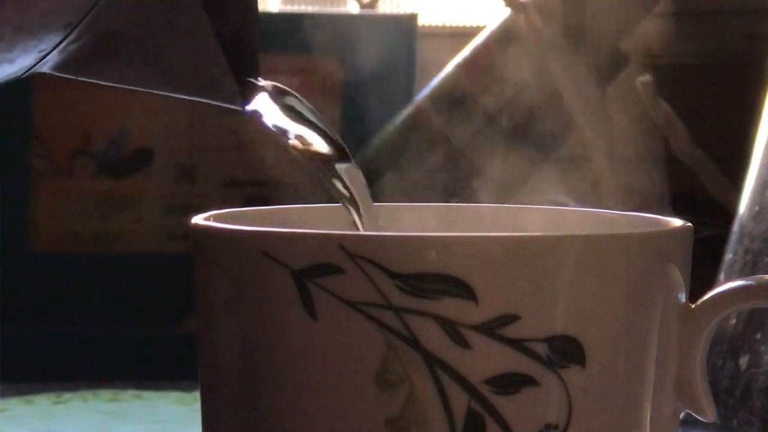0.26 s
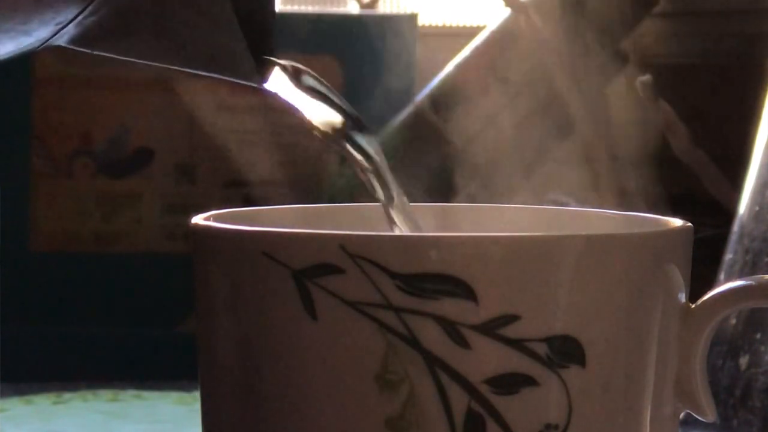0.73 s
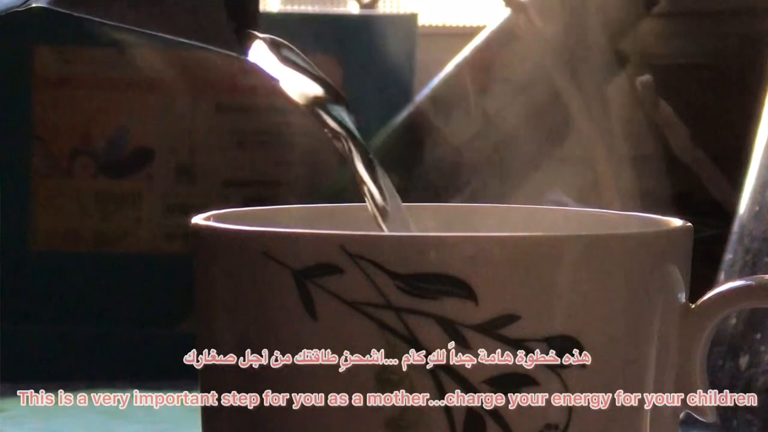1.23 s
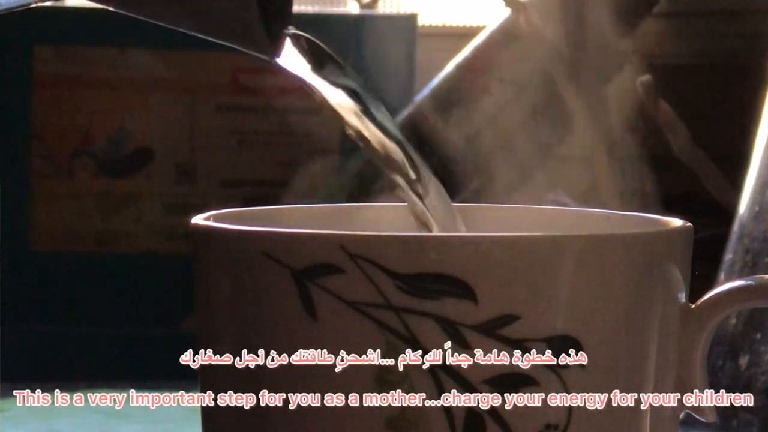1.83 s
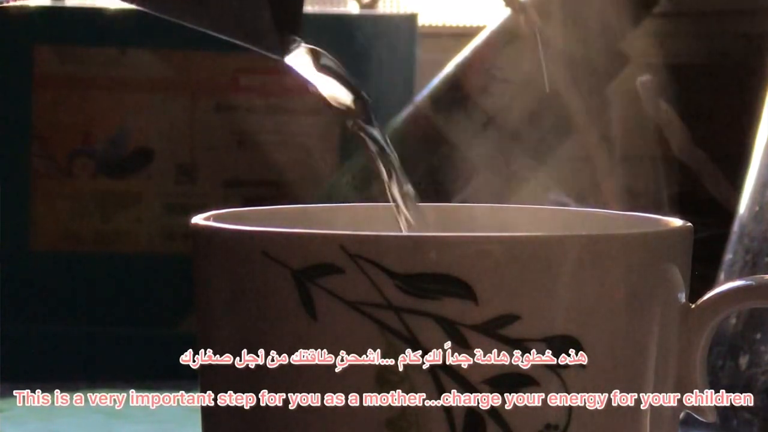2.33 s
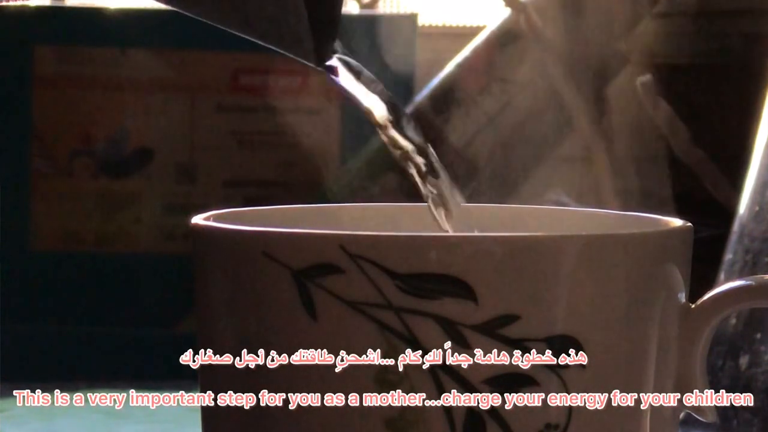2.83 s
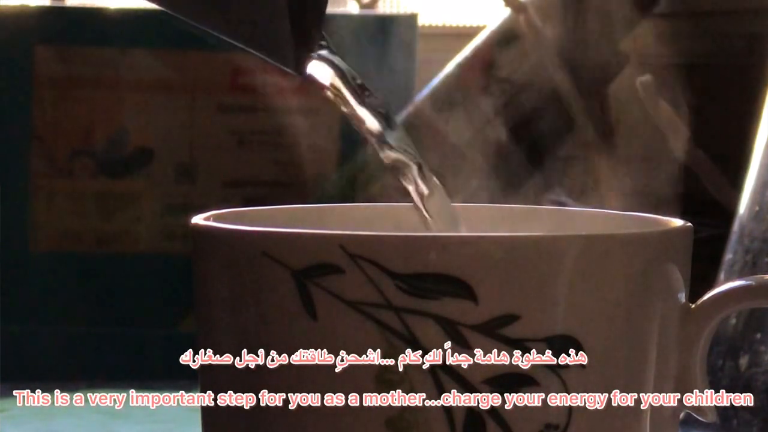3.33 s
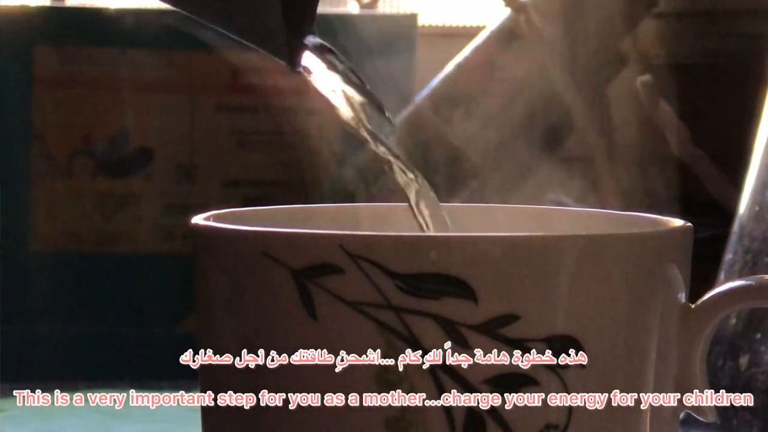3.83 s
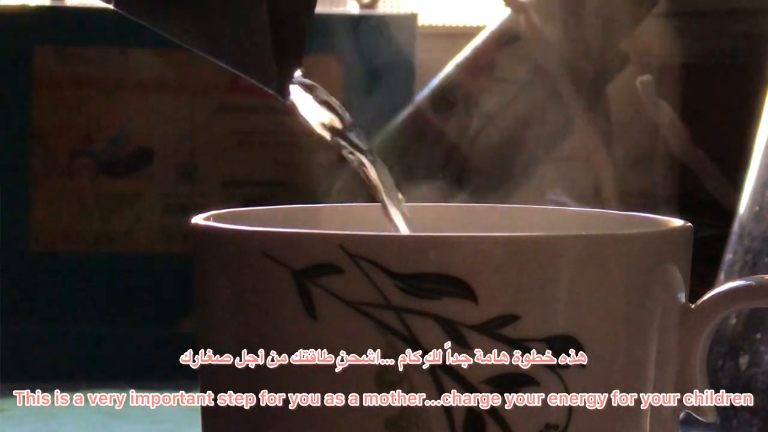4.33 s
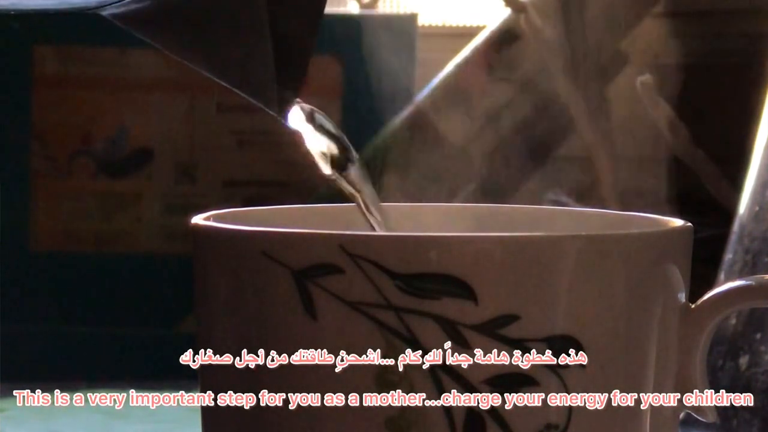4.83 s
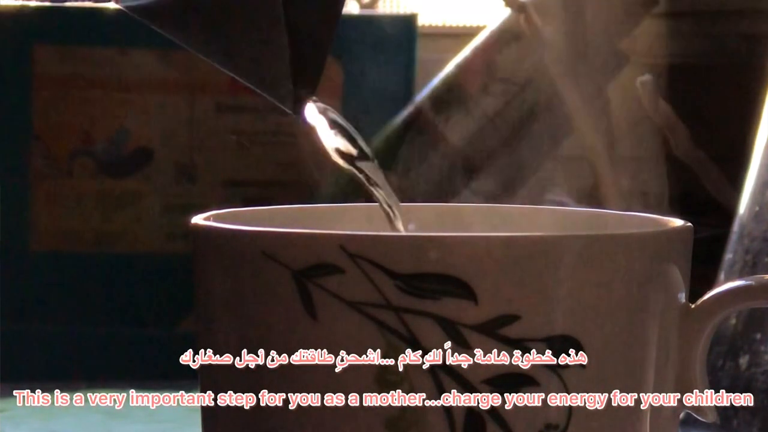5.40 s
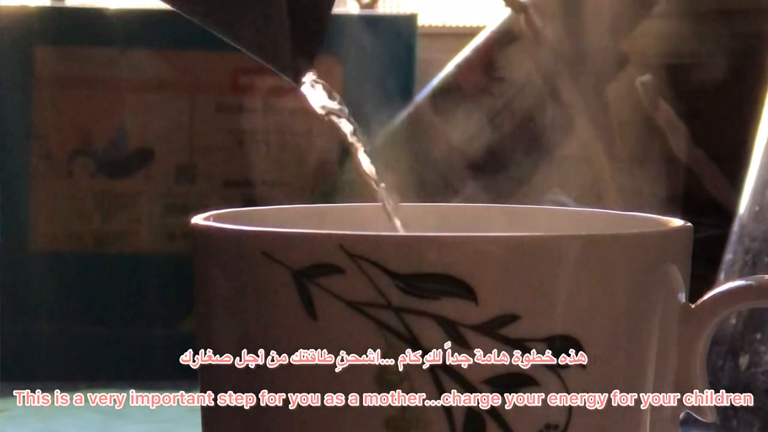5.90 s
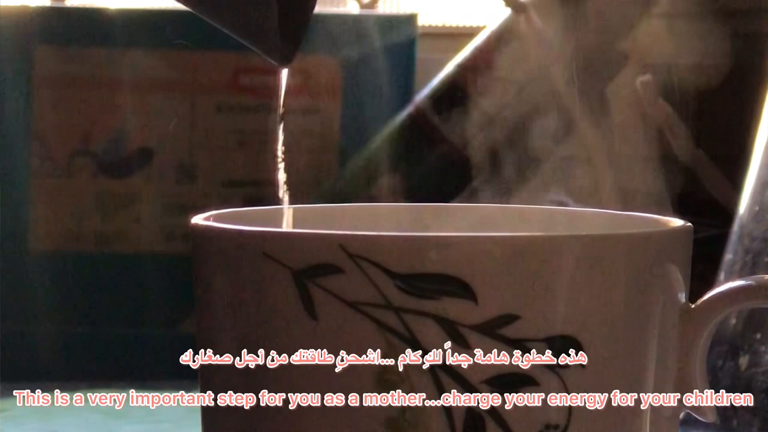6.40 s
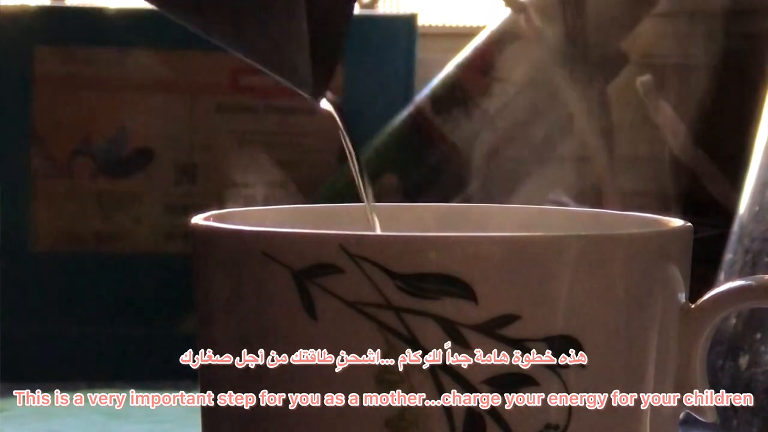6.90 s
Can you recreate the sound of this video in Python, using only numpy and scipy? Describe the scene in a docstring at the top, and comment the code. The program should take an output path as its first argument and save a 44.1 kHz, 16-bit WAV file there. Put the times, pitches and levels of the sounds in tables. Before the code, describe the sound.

In a small kitchen, water streams from a kettle into a ceramic mug. Rounded, hollow bubble plops come at uneven intervals, with light patter, spray and fizzing ticks around them. One plop stands out well before the middle. The stream breaks into sharper splashes, thins abruptly near the end, leaves a faint hiss, and two drips follow. A low, dull machine hum continues throughout. Close, slightly dull microphone with short room reflections.

```python
"""Small kitchen: hot water runs from a kettle into a ceramic mug, over a low machine hum.
Trapped bubbles ring the mug's air column; bursts of random impacts ring its modes as patter and spray.
The stream thins to a trace, a faint hiss swells, and two drips fall, each a slap and a gliding tone.
Behind: a soft rub (swelling low noise) and two low blips (upward-sliding harmonics with noise)."""
import sys
import numpy as np
from scipy import signal
from scipy.fft import rfft, irfft
from scipy.io import wavfile
from scipy.ndimage import uniform_filter1d

SR = 44100
rng = np.random.default_rng(int(sys.argv[2]) if len(sys.argv) > 2 else 0)


def transcribe(signal):
    """Save signal, clipped to [-1, 1], as a 16-bit WAV file at the path in sys.argv[1]."""
    frames = np.atleast_2d(signal).T
    limited = np.clip(frames, -1, 1)
    pcm = np.round(limited * 32767).astype(np.int16)
    wavfile.write(sys.argv[1], SR, pcm)


N = 315315
TIME_S = np.arange(N) / SR
BRIEF_S = TIME_S[:SR // 5]   # time axis of one short event

# Table levels are nominal: before the trims, mug colour and microphone.
# Steady hum lines: line_hz, level_rms_db, wander_rms_hz
HUM_LINES = [(46.7, -87, 2.2), (64.6, -83, 5.8), (196.5, -65.5, 2.94), (214.9, -61, 1.014), (244, -72, 3),
             (343.4, -70, 2.085), (440, -76, 1.9), (607, -79.5, 2.7)]
# Spectrum of the dull rush, relative: freq_hz, density_db_per_hz
RUSH_SPECTRUM = [(36, -52.5), (50, -24), (82, -30.5), (100, -12), (135, -7), (168, 1), (228, -7.5),
                 (285, -7), (330, -8), (450, -19.5), (900, -19), (1600, -26), (2400, -29), (4500, -35.5),
                 (8000, -47)]
# Low blips: start_s, level_db, start_pitch_hz
LOW_BLIPS = [(1.963, -48, 212.7), (5.03, -49.5, 214.2)]
# Air column resonances: freq_hz, width_hz, gain_db
AIR_MODES = [(558, 110, -11.5), (1040, 72, 4)]
# Thud resonances: freq_hz, width_hz, gain_db
THUD_MODES = [(320, 25, 0.88), (631, 94, -1)]
# Mug resonances driven by patter: freq_hz, width_hz, gain_db
PATTER_MODES = [(614, 100, -15.5), (1050, 130, 4.5), (1415, 110, 9), (1598, 120, 3.5), (1761, 45, 8),
                (2230, 63, -11)]
# Mug resonances driven by spray: freq_hz, width_hz, gain_db
SPRAY_MODES = [(2477, 270, -1.5), (2894, 110, 4.5), (3130, 250, -2.5), (4170, 410, -10), (5150, 840, -20),
               (6870, 380, -22)]
# Narrow peaks and dips of mug and surroundings, shared by all the water: freq_hz, width_hz, gain_db
MUG_COLOUR = [(830, 9.8, 6.5), (1211, 80, -9.5), (1272, 14, 3.5), (1380, 8.6, 4.5), (1627, 17, 6),
              (1787, 58, 3), (2090, 11, 4), (4200, 260, 1), (4900, 240, -5.5), (5220, 27, 8)]
# Droplets on the mug wall: start_s, level_db
WALL_TICKS = [(0.807, -49.5), (1.264, -57), (1.429, -61), (2.194, -57), (2.239, -50), (2.809, -53),
              (2.842, -54), (3.003, -58), (3.402, -51), (4.236, -51), (4.651, -49.5), (4.823, -52.5),
              (4.854, -51.5), (5.919, -56), (6.018, -54), (6.119, -55)]
# Bursts of tiny bubbles: start_s, level_db, centre_hz
FIZZ_BURSTS = [(1.4155, -48.5, 3520), (1.608, -46, 4730), (2.089, -53, 4100), (2.278, -31.5, 4700),
               (2.283, -37, 4800), (2.8583, -41.5, 4360), (2.936, -47, 4060), (2.955, -50, 4200),
               (3.09, -45, 4140), (3.21, -44, 3820), (3.4462, -44.5, 4600), (3.8952, -42.5, 4000),
               (4.2667, -43.5, 3700), (4.6498, -51, 3970), (4.936, -51, 4100), (5.226, -45.5, 3700),
               (5.41, -41.5, 4200), (5.8377, -45, 3960), (6.241, -42, 5240), (6.958, -51, 2650),
               (7.109, -46, 4480)]
# Froth where the jet drags in air: start_s, level_rms_db, peak_delay_s
FROTH_FLARES = [(0.509, -65.5, 0.036), (1.059, -63.5, 0.01), (5.405, -47, 0.0072), (5.451, -52, 0.0089)]
# Drips: start_s, impact_db, impact_pitch_hz, bubble_db, bubble_pitch_hz, glide_hz_per_s, bubble_peak_delay_s
DRIP_EVENTS = [(6.8512, -35, 1470, -49.5, 1421, 1490, 0.018), (7.076, -42, 1825, -57, 1860, 5440, 0.014)]
# Smaller bubbles on the upper air column mode: start_s, level_db
UPPER_PLINKS = [(0.026, -46), (0.268, -49), (0.489, -43), (0.512, -40), (0.528, -45), (0.544, -46),
                (0.604, -42.5), (0.674, -50), (0.767, -48.5), (0.994, -47), (1.077, -46.5), (1.405, -51.5),
                (1.515, -49.5), (1.54, -43), (1.609, -50.5), (1.857, -48), (2.08, -52), (2.137, -43.5),
                (2.243, -44), (2.289, -42), (2.311, -42), (2.326, -41), (2.432, -51.5), (2.571, -47.5),
                (2.739, -49), (2.773, -45.5), (2.792, -42.5), (2.94, -44), (3.007, -58), (3.088, -49.5),
                (3.326, -49.5), (3.406, -45.5), (3.61, -47), (3.639, -51), (3.766, -51), (3.841, -41),
                (3.863, -45), (3.895, -48), (3.916, -47), (4.176, -48.5), (4.218, -44.5), (4.249, -41.5),
                (4.267, -47), (4.52, -45), (4.627, -46), (4.762, -42.5), (4.878, -49.5), (5.036, -50.5),
                (5.122, -53), (5.348, -53), (5.375, -48), (5.406, -37), (5.434, -42), (5.452, -48),
                (5.467, -40), (5.574, -40.5), (5.835, -42.5)]
# Sharp, broad cracks of the water, some as a bubble is trapped: start_s, air_column_db, patter_db, spray_db,
# tick_db
SLAP_EVENTS = [(0.703, -45, -55, -53, -59), (0.845, -50, -64, -59, -63), (0.995, -50, -51.5, -62, -73),
               (1.309, -47, -49.5, -58.5, -62), (1.915, -54, -59, -73, -52.5), (3.261, -44, -46, -52, -50),
               (3.774, -50, -48, -65, -71), (4.329, -57, -51, -63, -49.5), (4.356, -51, -44.5, -63, -55),
               (5.121, -45, -45.5, -51, -72), (5.246, -52, -41.5, -48, -46.5), (5.687, -58, -52, -66, -69),
               (5.809, -35, -45, -37.5, -63), (5.943, -50, -38, -47.5, -61), (6.034, -47.5, -38, -44, -42),
               (6.157, -49, -47, -58, -43), (6.175, -43, -39, -38.5, -51), (6.205, -44, -49, -54, -51),
               (6.246, -49, -38, -64, -43.5)]
# Loudest plops: start_s, level_db, pitch_hz, patter_re_level_db
LOUD_PLOPS = [(0.024, -44.5, 897, -18), (0.325, -41.5, 945, -13), (0.421, -47, 985, -29),
              (0.438, -40.5, 996, -22), (0.49, -48, 1100, -7), (0.601, -39, 1015, -17),
              (0.809, -37, 982, -22), (1.212, -40.5, 1036, -10), (1.265, -30, 1023, -18.5),
              (1.539, -51, 1040, 0), (1.552, -35, 1000, -28), (1.591, -35, 1008, -16),
              (1.617, -35, 1033, -13), (1.834, -44, 1044, -20), (1.855, -34, 1018, -19),
              (1.878, -44, 1005, -24), (1.929, -38.5, 1016, -8), (2.115, -38, 1060, -23),
              (2.14, -44, 1040, -21), (2.205, -34.5, 1040, -26.5), (2.237, -32.5, 1023, -7.5),
              (2.286, -14.5, 1036, -20), (2.309, -33.5, 1010, -3), (2.325, -32.5, 966, -12),
              (2.431, -38.5, 1050, -14), (2.571, -41.5, 1010, -1.5), (2.605, -42.5, 1036, -8),
              (2.653, -41.5, 1040, -15), (2.684, -43.5, 1024, -15), (2.74, -38.5, 1040, -12),
              (2.769, -33.5, 1090, -11.5), (2.779, -29.5, 1030, -22), (2.792, -38, 1005, -6),
              (2.81, -31, 1040, -19), (2.841, -33.5, 1000, -11), (2.857, -41, 1020, -10),
              (2.921, -36.5, 1040, -8), (2.938, -40.5, 1013, -14), (3.004, -33.0, 1057, -19),
              (3.09, -36, 1047, -3), (3.119, -40.5, 1040, -18), (3.147, -38, 1050, -12),
              (3.273, -42, 1030, -7), (3.297, -31, 1044, -20), (3.316, -32.5, 1050, -22),
              (3.352, -39.5, 995, -4), (3.374, -39, 1007, -16), (3.404, -34, 1010, -21),
              (3.447, -44, 1050, -12), (3.487, -39, 1070, -12), (3.544, -43.5, 1065, -12.5),
              (3.571, -40.5, 1062, -3), (3.62, -42, 1090, -6), (3.652, -29.5, 1062, -39),
              (3.841, -41.5, 1040, -13), (3.866, -44, 1050, -12), (4.005, -43, 1060, -16),
              (4.021, -41.5, 1076, -11), (4.177, -46, 1040, -9), (4.198, -35, 1060, -10.5),
              (4.22, -37, 1066, -10), (4.237, -39, 1070, -16), (4.248, -38, 1100, -2),
              (4.266, -36, 1078, -3.5), (4.33, -41.5, 1116, -4), (4.468, -46, 1050, -14),
              (4.508, -33, 1073, -10.5), (4.614, -48, 1080, -15), (4.626, -41.5, 1090, -18),
              (4.652, -42, 1110, -6), (4.691, -35.5, 1057, -9.5), (4.72, -37.5, 1070, -15),
              (4.736, -39, 1000, -23), (4.762, -37, 1060, -15), (4.785, -32, 1093, -15),
              (4.809, -35.5, 1013, -7), (4.834, -29, 1050, -19), (4.854, -37.5, 1054, -9),
              (4.866, -39, 1024, -16), (4.878, -44, 1050, -1), (5.064, -38.5, 1057, -8.5),
              (5.291, -36.5, 997, -16), (5.313, -34, 992, -10), (5.325, -40, 1070, -11),
              (5.336, -38.5, 1100, -7), (5.378, -34, 1060, -21), (5.409, -35.5, 1030, -14),
              (5.433, -48, 1040, -2), (5.452, -31.0, 990, -13), (5.483, -36, 1043, -10),
              (5.515, -37, 1080, -5), (5.741, -41.5, 1116, -2), (5.82, -28.5, 1040, -12),
              (5.838, -23.5, 1070, -18), (5.861, -31, 1054, -17), (5.882, -36.5, 1110, -19),
              (5.894, -35.5, 994, -18), (5.904, -36, 1018, -19), (5.963, -37, 974, 0),
              (5.981, -42, 1040, -5), (6.033, -41, 1090, -20), (6.07, -40.5, 1104, -6),
              (6.255, -36.5, 1054, -11), (6.268, -39, 1140, -4), (6.288, -27.5, 1115, -9),
              (6.304, -37, 1230, -18), (6.314, -43, 1090, -7), (6.325, -43, 1230, -5),
              (6.347, -39.5, 1040, -26), (6.397, -36, 1060, -21), (6.416, -43.5, 1090, -16)]
# Flow of the stream: time_s, gurgle_db, patter_db, spray_db
STREAM_FLOW = [(0.0, -64.5, -78.5, -67), (0.61, -63.5, -65.5, -62.5), (1.03, -69.5, -77, -64),
               (2.06, -59, -72, -63), (2.971, -60, -68, -64.5), (3.09, -63.5, -73, -62.5),
               (3.44, -56.5, -75, -65), (3.64, -61.5, -66.5, -68.5), (4.16, -62.5, -69, -63.5),
               (4.74, -58.5, -64, -67), (4.91, -61.5, -73, -59.5), (5.14, -62.5, -73, -73),
               (5.43, -61, -59, -60), (5.74, -63.5, -69.5, -69), (5.93, -51, -55.5, -62.5),
               (6.02, -63, -61, -60.5), (6.21, -64, -59, -65), (6.37, -55, -71.5, -70),
               (6.5, -67, -67, -85)]

# Room
RUSH_DB, RUSH_DEFICIT_DB, RUSH_SETTLE_S = -57.5, 1.5, 2   # starts softer by the deficit; time constant
KITCHEN_T60_S, KITCHEN_DB = 0.33, -11.5
CUTOFF_HZ = 8600
RUB_START_S, RUB_DB, RUB_HZ = 0.82, -57.5, 380
# Stream
GURGLE_TRIM_DB, PATTER_TRIM_DB, SPRAY_TRIM_DB = -2, -3, -1
SIZZLE_RE_SPRAY_DB = -10   # follows the spray level, without its trim
RINGING_RE_GURGLE_DB, RINGING_RATE_HZ = -6, 99   # the air column sings on between plops
THIN_START_S, THIN_END_S = 6.38, 6.5
# The air column shortens as the mug fills
EMPTY_HZ, FULL_HZ, FILL_S, PITCH_SCATTER_HZ = 985, 1151, 4.8, 30
UPPER_HZ, UPPER_RISE_HZ_PER_S, UPPER_SCATTER_HZ = 2839, 14, 20
# Plops
PLOP_TRIM_DB, PLOP_LEAD_S, PLINK_TRIM_DB = -3, 0.00052, -3.5
PLOP_SPRAY_DB, THUD_DB = -20, -10   # re the note
USUAL_PLOP_DB, LOSS_DB_PER_DB = -38.5, 0.14   # big plops: relatively less spray and thud
SCOOP, SCOOP_S = 0.36, 0.00067   # starts this share flat; settling time constant
THUD_CUT_HZ = 220   # the small mug radiates little below this
SMALL_PLOPS_PER_S, SMALL_PLOP_RE_GURGLE_DB, SMALL_SPREAD_DB = 14, 7, 0.5
SMALL_PATTER_DB, SMALL_SPRAY_DB = -9, -12.5   # re the note
# Fizzes and droplets
FIZZ_TRIM_DB, USUAL_FIZZ_DB = -5.5, -47
FIZZ_TICK_DB, FIZZ_TICK_FOLLOWS = -57, 0.14   # tick of a usual fizz; share of the fizz's level swing
RIM_DB_PER_S = -1   # re mid-pour; negative: the highest sounds lose level as the pour goes on
STRAYS_PER_S, STRAY_DB, STRAY_SPREAD_DB = 28, -63, 3.5
STRAY_LOW_HZ, STRAY_HIGH_HZ, STRAY_CYCLES = 1830, 7100, 8.3
GRAINS_PER_S, FIRST_CONTACT = 12000, 2.3   # impacts within a splash; boost of the first


def from_db(db):
    """Decibels to gain."""
    return 10 ** (np.asarray(db) / 20)


def rms_one(x):
    """Scale to an rms of one."""
    return x / np.sqrt(np.mean(x ** 2) + 1e-20)


def add(out, start_s, sound):
    """Mix a short sound in at start_s."""
    at = max(int(start_s * SR), 0)
    out[at:at + len(sound)] += sound[:N - at]


def lowpass(x, order, cut_hz):
    """Butterworth treble cut."""
    return signal.sosfilt(signal.butter(order, cut_hz, fs=SR, output="sos"), x)


def drift(rate_hz):
    """Slow random motion, rms of one: low-passed noise."""
    freq_hz = np.fft.rfftfreq(N, 1 / SR)
    spectrum = rfft(rng.standard_normal(N)) / (1 + (freq_hz / rate_hz) ** 2)
    return rms_one(irfft(spectrum, N))


def surges(rate_hz, depth_db):
    """Gain that wobbles at random within +/- depth_db."""
    return from_db(depth_db * np.tanh(drift(rate_hz)))


def resonate(x, modes):
    """Parallel two-pole resonances with alternating signs."""
    out = 0
    for k, (hz, width_hz, gain_db) in enumerate(modes):
        r = np.exp(-np.pi * width_hz / SR)
        poles = [1, -2 * r * np.cos(2 * np.pi * hz / SR), r * r]
        ring = signal.lfilter([1, 0, -1], poles, x + 1e-18)
        out = out + (-1) ** k * from_db(gain_db) * (1 - r * r) / 2 * ring
    return out


def swell(peak_s):
    """Envelope of a driven resonance: builds to one at peak_s, then dies."""
    return BRIEF_S / peak_s * np.exp(1 - BRIEF_S / peak_s)


def glide(hz, rise_hz_per_s):
    """Phase of a tone with linearly rising pitch."""
    return 2 * np.pi * (hz + rise_hz_per_s * BRIEF_S / 2) * BRIEF_S


def splash(modes, decay_s):
    """Decaying burst of separate tiny impacts rings the modes; peak of about one."""
    hits = rng.random(len(BRIEF_S)) < GRAINS_PER_S / SR
    burst = rng.standard_normal(len(BRIEF_S)) * hits * np.exp(-BRIEF_S / decay_s)
    burst[0] += FIRST_CONTACT
    sound = resonate(burst, modes)
    return sound / (2 * np.sqrt(uniform_filter1d(sound ** 2, size=100).max()))


def droplets(per_s, spread_db, clumps):
    """Random impacts of uneven size and either sign, scaled by the clumps gain."""
    size_db = spread_db * np.minimum(rng.exponential(1, N), 3.5)
    sizes = from_db(size_db) * rng.choice([-1, 1], N)
    return sizes * (rng.random(N) < per_s / SR) * clumps


def bubbles(low_hz, high_hz, per_s, cycles, clumps):
    """Small bubbles of ten sizes, each ringing for a few cycles at its own pitch; rms of one."""
    clicks = droplets(per_s, 4.3, clumps)
    size_class = rng.integers(0, 10, N)
    out = np.zeros(N)
    for k, hz in enumerate(np.geomspace(low_hz, high_hz, 10)):
        out += resonate(clicks * (size_class == k), [(hz, hz / cycles, 0)])
    return rms_one(out)


def column_hz(time_s):
    """Air column pitch, rising as the mug fills."""
    return FULL_HZ + (EMPTY_HZ - FULL_HZ) * np.exp(-time_s / FILL_S)


def exposure_db(time_s):
    """Level slope of the highest sounds, zero at mid-pour."""
    return RIM_DB_PER_S * (time_s - THIN_START_S / 2)


def flow():
    """Gurgle, patter and spray levels in dB at every sample, interpolated."""
    time_s, *levels_db = np.transpose(STREAM_FLOW)
    return [np.interp(TIME_S, time_s, level_db) for level_db in levels_db]


def kitchen(x):
    """Diffuse reflections from nearby walls: decaying noise, evened so that no single pitch rings on."""
    t = TIME_S[:SR // 2]
    fade = from_db(-60 * t / KITCHEN_T60_S) * (t > .006)
    tail = rng.standard_normal(len(t)) * fade
    for _ in range(10):   # flatten the spectrum, then restore the decay
        tail = irfft(np.exp(1j * np.angle(rfft(tail))), len(t))
        tail = tail * fade / np.sqrt(np.abs(uniform_filter1d(tail ** 2, size=400)) + 1e-20)
    return from_db(KITCHEN_DB) * signal.fftconvolve(x, tail / np.linalg.norm(tail))[:N]


def hum():
    """Machine drone: sines of wandering pitch on a dull rush of shaped noise."""
    hz, db = np.transpose(RUSH_SPECTRUM)
    freq_hz = np.fft.rfftfreq(N, 1 / SR)
    shape = from_db(np.interp(np.log(freq_hz + 1), np.log(hz), db))
    rush = rms_one(irfft(rfft(rng.standard_normal(N)) * shape, N))
    out = from_db(RUSH_DB - RUSH_DEFICIT_DB * np.exp(-TIME_S / RUSH_SETTLE_S)) * rush
    for line_hz, line_db, wander_hz in HUM_LINES:
        phase = 2 * np.pi * np.cumsum(line_hz + wander_hz * drift(6.14)) / SR
        out += from_db(line_db) * np.sqrt(2) * np.sin(phase)
    return out


def rub():
    """Soft rub: low resonant noise swells and fades."""
    out = np.zeros(N)
    noise = rms_one(resonate(rng.standard_normal(len(BRIEF_S)), [(RUB_HZ, 110, 0)]))
    add(out, RUB_START_S, from_db(RUB_DB) * swell(peak_s=0.028) ** 2 * noise)
    return out


def blips():
    """Faint noise swish leads into three upward-sliding harmonics with a low rustle."""
    out = np.zeros(N)
    for start_s, db, hz in LOW_BLIPS:
        phase = glide(hz, 1000)
        tone = swell(peak_s=0.03) ** 1.4 * np.sin(phase)
        tone += swell(peak_s=0.014) ** 3.2 * np.sin(2 * phase)
        tone += 0.099 * swell(peak_s=0.0073) ** 3 * np.sin(3 * phase)
        rustle = rms_one(resonate(rng.standard_normal(len(BRIEF_S)), [(560, 94, 0)]))
        swish = rms_one(resonate(rng.standard_normal(len(BRIEF_S)), [(2040, 860, 0)]))
        noise_swell = swell(peak_s=0.025) ** 2
        add(out, start_s, from_db(db) * (tone + 0.58 * noise_swell * rustle))
        add(out, start_s - .04, from_db(db - 14.5) * noise_swell * swish)
    return out


def colour(x):
    """Mug and surroundings: narrow resonances ring on, dips stay dark."""
    for hz, width_hz, gain_db in MUG_COLOUR:
        x = x + (from_db(gain_db) - 1) * resonate(x, [(hz, width_hz, 0)])
    return x


def foam():
    """Faint resonant hiss swells and fades as the stream ends."""
    hiss = rms_one(resonate(rng.standard_normal(N), [(960, 370, -1.8), (1650, 470, -0.16)]))
    return from_db(-62.5) * hiss * np.interp(TIME_S, [6.42, 6.63, 6.9, 7.15], [0.012, 0.93, 0.38, 0.11])


def strays():
    """Stray droplets hit water and wall at random: crisp ticks, each at its own pitch."""
    out = np.zeros(N)
    for k, (late, size) in enumerate(rng.random((int(THIN_START_S * STRAYS_PER_S), 2))):
        start_s = (k + late) / STRAYS_PER_S
        hz = STRAY_LOW_HZ * (STRAY_HIGH_HZ / STRAY_LOW_HZ) ** size
        db = STRAY_DB + exposure_db(start_s) + STRAY_SPREAD_DB * rng.standard_normal()
        add(out, start_s, from_db(db) * splash([(hz, hz / STRAY_CYCLES, 0)], decay_s=0.0005))
    return out


def ticks():
    """Droplet strikes the glaze: a very short, bright impact burst."""
    out = np.zeros(N)
    for start_s, db in WALL_TICKS:
        add(out, start_s, from_db(db) * splash([(5900, 2900, 0)], decay_s=0.0017))
    return out


def fizzes():
    """Cluster of tiny bubbles bursts: sizzle at their pitch, longer if louder, plus a thin tick."""
    out = np.zeros(N)
    for start_s, db, hz in FIZZ_BURSTS:
        excess_db = db - USUAL_FIZZ_DB
        sizzle = lowpass(splash([(hz, 750, 0)], decay_s=0.009 * from_db(0.072 * excess_db)), 4, 6200)
        tick = splash([(6700, 4400, 0)], decay_s=0.00087)
        tick_db = FIZZ_TICK_DB + FIZZ_TICK_FOLLOWS * excess_db + exposure_db(start_s)
        add(out, start_s, from_db(db + FIZZ_TRIM_DB) * sizzle + from_db(tick_db) * tick)
    return out


def froth():
    """Dense crowd of tiny ringing bubbles flares up and dies away."""
    level = np.zeros(N)
    for start_s, db, peak_s in FROTH_FLARES:
        add(level, start_s, from_db(db) * swell(peak_s) ** 0.46)
    crowd = bubbles(3400, 4620, per_s=1100, cycles=66, clumps=1)
    return level * lowpass(crowd, 4, 5200)


def drips():
    """Drip slaps the surface; its bubble rings with wobbling level and phase, gliding upward."""
    out = np.zeros(N)
    shake = drift(100)
    for start_s, db, hz, bubble_db, bubble_hz, rise_hz_per_s, peak_s in DRIP_EVENTS:
        slap = 0.64 * swell(peak_s=0.0032) ** 1.7 * np.sin(glide(hz, 0))
        slap += 0.47 * swell(peak_s=0.0027) ** 1.3 * np.sin(glide(AIR_MODES[1][0], 0))
        slap += 0.95 * splash(PATTER_MODES, decay_s=0.003)
        slap += 0.39 * splash(SPRAY_MODES, decay_s=0.01)
        wobble = np.roll(shake, -int(start_s * SR))[:len(BRIEF_S)]
        envelope = swell(peak_s) ** 0.78 * from_db(3.6 * np.tanh(wobble))
        bubble = envelope * np.sin(glide(bubble_hz, rise_hz_per_s) + 1.6 * wobble)
        add(out, start_s, from_db(db) * slap + from_db(bubble_db) * bubble)
    return out


def plinks():
    """Smaller bubble rings the upper air column mode, which creeps up, inside a burst of spray."""
    out = np.zeros(N)
    for start_s, db in UPPER_PLINKS:
        hz = UPPER_HZ + UPPER_RISE_HZ_PER_S * start_s + UPPER_SCATTER_HZ * rng.standard_normal()
        note = swell(peak_s=0.0032) ** 0.78 * np.sin(glide(hz, 0))
        spray = splash(SPRAY_MODES, decay_s=0.0087)
        add(out, start_s, from_db(db + PLINK_TRIM_DB) * (0.66 * note + 0.76 * spray))
    return out


def slaps():
    """Water lands with a sharp, broad crack: bursts in all mode groups."""
    out = np.zeros(N)
    for start_s, air_db, patter_db, spray_db, tick_db in SLAP_EVENTS:
        sound = from_db(air_db) * splash(AIR_MODES, decay_s=0.00067)
        sound += from_db(patter_db) * splash(PATTER_MODES, decay_s=0.0037)
        sound += from_db(spray_db) * splash(SPRAY_MODES, decay_s=0.0062)
        sound += from_db(tick_db) * splash([(6000, 4700, 0)], decay_s=0.0026)
        add(out, start_s, sound)
    return out


def plop(hz, patter_db, spray_db, thud_db):
    """Large bubble pumps the air column for a few cycles, thuds in the water and throws spray."""
    pitch_hz = hz * (1 - SCOOP * np.exp(-BRIEF_S / SCOOP_S))
    note = swell(peak_s=0.0035) ** 1.78 * np.sin(2 * np.pi * np.cumsum(pitch_hz) / SR)
    thud = from_db(thud_db) * splash(THUD_MODES, decay_s=0.00082)
    thud = signal.sosfilt(signal.butter(2, THUD_CUT_HZ, "high", fs=SR, output="sos"), thud)
    patter = lowpass(1.02 * from_db(patter_db) * splash(PATTER_MODES, decay_s=0.0061), 2, 3200)
    spray = from_db(spray_db) * splash(SPRAY_MODES, decay_s=0.0081)
    return note + thud + patter + spray


def small_plops():
    """Weaker bubbles, one at a random moment per slot, follow the gurgle level and filling pitch."""
    out, gurgle_db = np.zeros(N), flow()[0]
    for k in range(int(THIN_START_S * SMALL_PLOPS_PER_S)):
        start_s = (k + rng.random()) / SMALL_PLOPS_PER_S
        db = np.interp(start_s, TIME_S, gurgle_db) + SMALL_PLOP_RE_GURGLE_DB
        db += SMALL_SPREAD_DB * rng.standard_normal()
        hz = column_hz(start_s) + PITCH_SCATTER_HZ * rng.standard_normal()
        add(out, start_s, from_db(db) * plop(hz, SMALL_PATTER_DB, SMALL_SPRAY_DB, THUD_DB))
    return out


def plops():
    """Jet traps large bubbles at uneven intervals; louder ones are rounder."""
    out = np.zeros(N)
    for start_s, db, hz, patter_db in LOUD_PLOPS:
        loss_db = LOSS_DB_PER_DB * (db - USUAL_PLOP_DB)
        sound = plop(hz, patter_db, PLOP_SPRAY_DB - loss_db, THUD_DB - loss_db)
        add(out, start_s - PLOP_LEAD_S, from_db(db + PLOP_TRIM_DB) * sound)
    return out


def ringing():
    """Churning surface keeps the air column singing unevenly: two drifting quadratures, rms near one."""
    phase = 2 * np.pi * np.cumsum(column_hz(TIME_S)) / SR
    return drift(RINGING_RATE_HZ) * np.cos(phase) + drift(RINGING_RATE_HZ) * np.sin(phase)


def stream():
    """Jet churns the surface: random drops and bubbles ring as gurgle, patter, spray and sizzle."""
    gurgle_db, patter_db, spray_db = flow()
    clumps = surges(rate_hz=36, depth_db=8)
    foaming = surges(rate_hz=32, depth_db=5.5)
    gurgle = rms_one(resonate(droplets(per_s=300, spread_db=5.0, clumps=clumps), AIR_MODES))
    gurgle += from_db(RINGING_RE_GURGLE_DB) * ringing()
    patter = 1.24 * rms_one(resonate(droplets(per_s=310, spread_db=-1.5, clumps=clumps), PATTER_MODES))
    patter += 0.68 * bubbles(1250, 2500, per_s=520, cycles=20, clumps=clumps)
    spray = 0.39 * rms_one(resonate(droplets(per_s=900, spread_db=7.5, clumps=foaming), SPRAY_MODES))
    spray += 0.61 * bubbles(2825, 2925, per_s=390, cycles=43, clumps=foaming)
    sizzle = bubbles(3300, 4650, per_s=600, cycles=70, clumps=foaming)
    sizzle += 0.3 * bubbles(5600, 6500, per_s=370, cycles=18, clumps=foaming)
    out = from_db(gurgle_db + GURGLE_TRIM_DB) * gurgle
    out += from_db(patter_db + PATTER_TRIM_DB) * patter
    out += from_db(spray_db + SPRAY_TRIM_DB) * spray
    out += from_db(spray_db + SIZZLE_RE_SPRAY_DB) * sizzle
    return out * np.interp(TIME_S, [THIN_START_S, THIN_END_S], [1, .03])


def scene():
    """Water, rub and blips with room reflections, over the dry hum."""
    drone = hum()
    background = rub() + blips()
    droplet_sounds = foam() + strays() + ticks() + fizzes() + froth() + drips()
    bubble_sounds = plinks() + slaps() + small_plops() + plops()
    water = colour(droplet_sounds + bubble_sounds + stream())
    return (water + background + kitchen(water + background) + drone)[None]


def record(dry):
    """Dull microphone (low-pass), steep top cut and a trace of hiss."""
    dull = lowpass(dry, 5, 6600)
    cut = signal.sosfilt(signal.ellip(8, .5, 70, CUTOFF_HZ, fs=SR, output="sos"), dull)
    return cut + from_db(-100) * rng.standard_normal(dry.shape)


dry = scene()
out = record(dry)
transcribe(out)
```